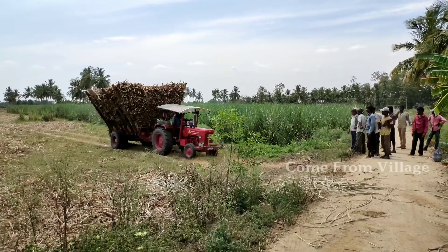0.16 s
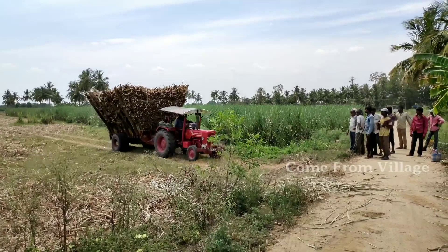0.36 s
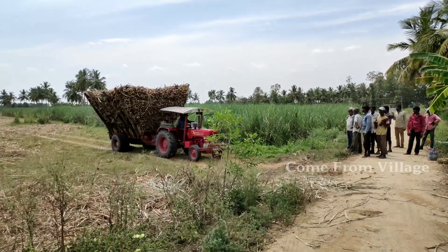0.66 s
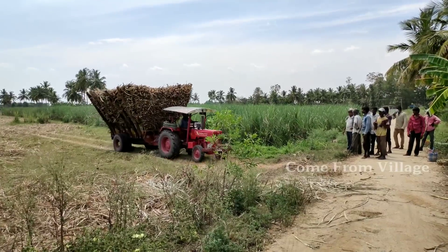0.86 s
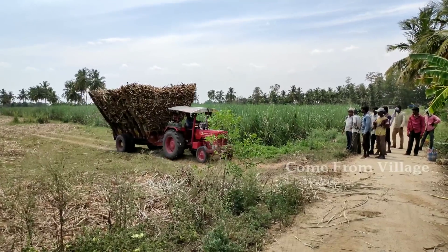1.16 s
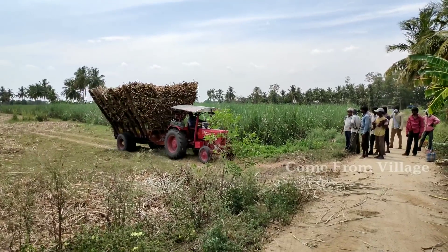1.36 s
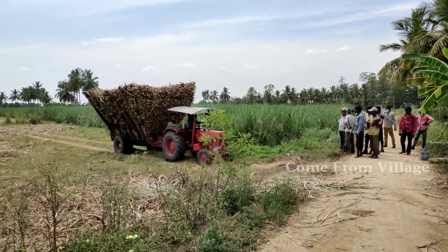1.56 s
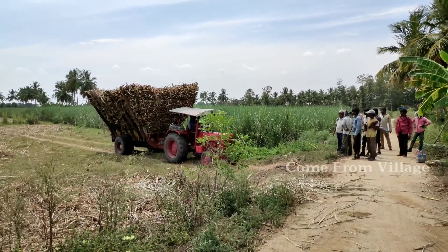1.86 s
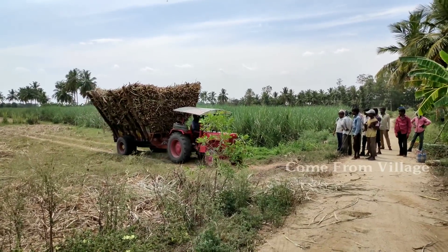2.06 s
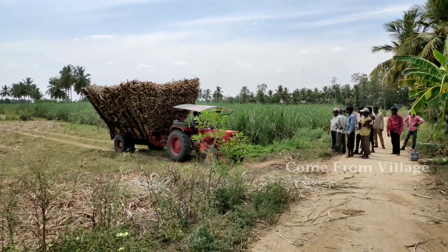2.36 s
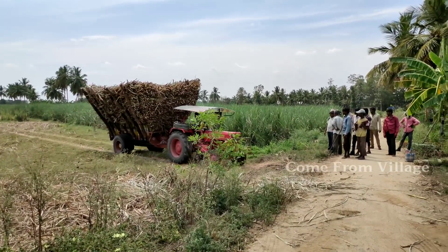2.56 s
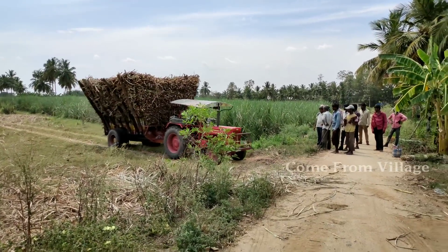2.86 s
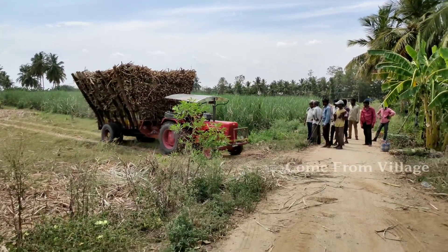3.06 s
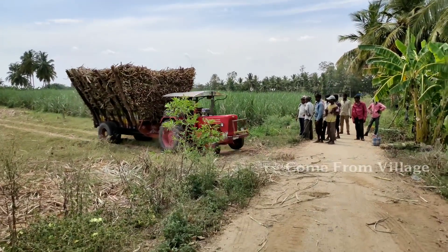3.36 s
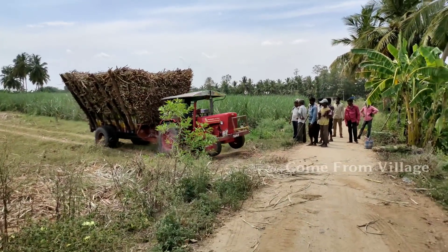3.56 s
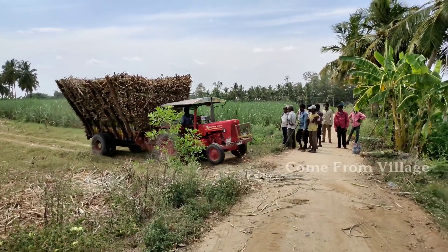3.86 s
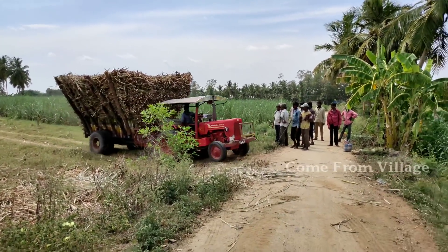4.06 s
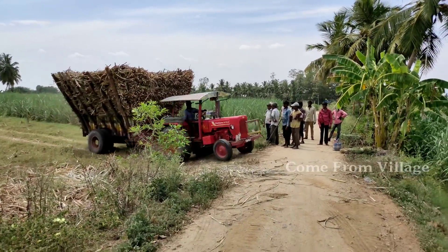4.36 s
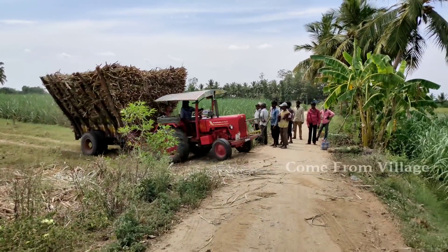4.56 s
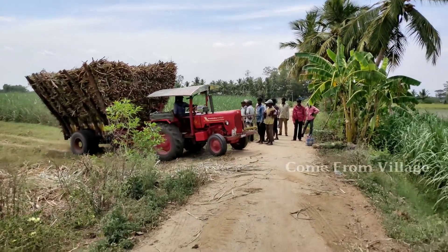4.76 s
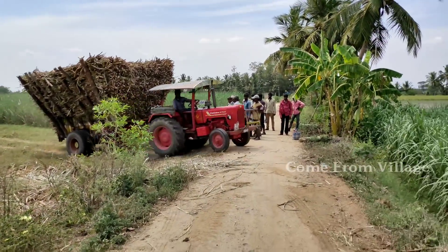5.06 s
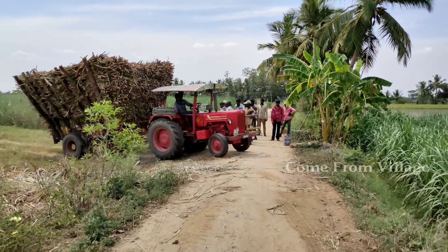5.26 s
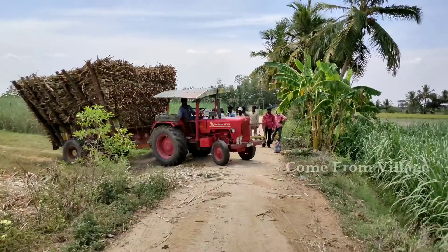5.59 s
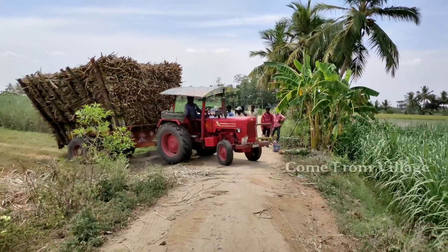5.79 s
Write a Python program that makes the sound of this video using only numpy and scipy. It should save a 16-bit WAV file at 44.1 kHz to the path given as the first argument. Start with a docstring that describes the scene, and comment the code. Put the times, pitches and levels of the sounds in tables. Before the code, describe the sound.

Out in a field, a tractor's diesel engine thumps slowly and unevenly, then revs up into a hard, clattering growl as it hauls a trailer of cane toward the microphone. A low rumble of wheels and wind lies beneath it, with occasional sharp snaps and light knocks from the load. The engine backs off several times in the second half before pulling strongly again, now closer and louder.

```python
"""A diesel tractor chugs unevenly, revs up, eases off a few times and pulls hard again, coming closer.
It drags a loaded cane trolley over a field onto a dirt track: wheels rumble, the load knocks and snaps.
The governor hunts at low speed until the throttle opens. The four cylinders fire as a pulse train that
drives resonators: each firing thumps and barks in the exhaust stack, knocks in the block and lets out
a rasp of gas. The firing rate sets the pitch; fuel, speed and distance set the level."""
import sys
import numpy as np
from scipy import signal
from scipy.fft import rfft, irfft, next_fast_len
from scipy.io import wavfile
from scipy.ndimage import uniform_filter1d

SR = 44100
rng = np.random.default_rng(int(sys.argv[2]) if len(sys.argv) > 2 else 0)


def store_pcm(level_fs):
    """Save levels as 16-bit WAV."""
    pcm = np.round(np.clip(level_fs, -1, 1) * 32767).astype(np.int16)
    wavfile.write(sys.argv[1], SR, np.atleast_2d(pcm).T)


N = 261513
TIME = np.arange(N) / SR

# firing rate of the engine: t/s, f/Hz
FIRING_RATE = [(0.0, 41.5), (0.386, 44.8), (0.523, 44.98), (0.67, 41.3), (0.905, 43.2), (1.685, 43.73),
               (1.793, 41.3), (2.019, 41.59), (2.251, 49.67), (2.494, 51.39), (3.062, 58.99),
               (3.366, 65.64), (3.593, 63.72), (3.841, 68.8), (4.122, 66.46), (4.257, 68.96),
               (5.005, 70.08), (5.171, 67.69), (5.93, 68.07)]
# shots of fuel from the hunting governor: middle t/s, length/s, share of full fuel added
GOVERNOR_SURGES = [(.1, .33, 0.38), (.39, 0.175, 0.89), (.719, 0.22, 0.6), (.878, .165, 0.27),
                   (1.0, 0.16, 0.39), (1.296, 0.28, .38), (1.614, 0.25, 0.18), (1.94, .26, 0.58)]
# brief easings under way: middle t/s, length/s, share of full fuel removed
FUEL_EASINGS = [(2.37, 0.25, 0.12), (2.897, 0.16, .18), (3.904, 0.18, .38), (4.395, 0.22, 0.65),
                (4.485, .2, 0.43), (4.717, 0.32, 0.64), (4.996, 0.57, .73), (5.65, 0.14, 0.17)]
# cylinders in firing order: exhaust level/dB, knock and rasp level/dB, bark delay/firing cycles
CYLINDERS = [(-1.1, 3.5, -0.001), (-1.3, 4.5, -0.018), (-0.44, 5, -0.001), (-1.25, 3, -0.028)]
# spectrum of wheels and wind: f/Hz, level/dB
GROUND_SPECTRUM = [(20, -12), (50, -4), (110, -3), (200, -4), (280, -6), (370, -15), (500, -13), (800, -20),
                   (3000, -36)]
# knocks and snaps of the load: t/s, level/dB, f/Hz, time to fall 60 dB/s
LOAD_IMPACTS = [(2.5328, -17.5, 7270, 0.0061), (2.5738, -12, 7250, 0.0069), (3.7454, -9.5, 6860, 0.0051),
                (4.470, -17.5, 393.1, 0.071), (4.472, -27.5, 1915, 0.021), (4.825, -28.5, 554.3, 0.11),
                (5.0892, -5.5, 7240, 0.0051)]
# modes of a loose metal panel: f/Hz, width/Hz, level/dB
PANEL_MODES = [(497, 52, -1.5), (940, 120, 0), (1050, 130, 0.5), (1122, 55, 2.5), (1746, 99, -4)]
# whistles in the exhaust gas: middle t/s, length/s, f/Hz, width/Hz, level/dB
GAS_WHISTLES = [(1.251, 0.16, 5250, 597, -52), (1.317, 0.15, 5920, 700, -48), (1.96, 0.15, 5870, 800, -45),
                (2.14, 0.17, 6000, 549.3, -41), (2.602, 0.66, 6080, 600, -42),
                (3.7, 0.28, 6600, 884.5, -37), (5.322, .18, 6190, 550, -33),
                (5.526, 0.31, 6530, 800, -33.5)]
# spectrum of the escaping gas: f/Hz, level/dB
RASP_SPECTRUM = [(1500, -32), (3500, -22), (4700, -17.5), (5400, -11.5), (6050, -9), (6600, -7), (7150, -4),
                 (7450, 0.5), (7700, -10), (8000, -12.5)]
# modes of the block and bonnet: f/Hz, width/Hz, level/dB
BLOCK_MODES = [(503, 140, 4.5), (676, 156, 5.5), (974, 220, 2), (1161, 190, -2), (1351, 200, -1),
               (1503, 256, 0.8), (1804, 170, -3.5), (1998, 203, -1.5), (2184, 290, -4), (2597, 268, -3),
               (2886, 160, -2.5), (3113, 165, -2), (3343, 170, -4.5), (3575, 124, -1.5), (3945, 380, -7.5),
               (4560, 1180, -6)]
# upper response of the stack when lugging: f/Hz, level/dB
COUGH_RESPONSE = [(130, -23), (285, 1), (375, -15.5), (430, 0.5), (500, -5.5), (550, -1.5), (630, 4),
                  (750, -3.5), (850, -8), (1000, -5.5), (1200, -20.5), (1550, -18.5), (2250, -14),
                  (2900, -21.5), (5000, -36)]
# upper response of the stack at speed: f/Hz, level/dB
GROWL_RESPONSE = [(130, -34), (255, -5), (305, -22), (340, -1), (375, -6), (405, -5), (440, -4.5),
                  (475, 1.5), (510, 5.5), (545, -1.5), (578, -1), (612, -2.5), (680, -9.5), (735, -19),
                  (815, -18), (900, -31.5), (1500, -36.5)]
# low response of the stack: f/Hz, level/dB
STACK_RESPONSE = [(23, -53.5), (38, -6.5), (52, 2.5), (63, 3.9), (69, -0.06), (105, 1.6), (135, 3.5),
                  (152, -2.5), (172, -4.5), (205, -6.5), (268, -8), (305, -20.5), (340, -11), (600, -27.5)]
# added ringing of the pipe on light fuel: f/Hz, level/dB
LIGHT_FUEL_RESPONSE = [(40, 6), (62, -7.5), (88, 4.0), (110, -14.5), (130, -2.5), (172, 2.0),
                       (215, -20.5), (300, -3), (380, -22)]
# muffling of the left microphone port: f/Hz, left minus right level/dB
PORT_BALANCE = [(60, 1.5), (180, 3.5), (310, -0.5), (540, -3.5), (750, -4), (1000, -10.5), (1600, -23.5),
                (2800, -16.5), (4900, -12), (6400, -2.5), (7500, -17.5)]
# phase between the ports: f/Hz, left minus right phase/rad
PORT_PHASE = [(0, 0), (130, -.3), (500, -1.2), (800, -1.9), (1500, -2.4), (2500, -.3), (6000, -.8),
              (7000, -3)]

THROTTLE_AT_S, THROTTLE_RISE_S = 1.991, .14
WORKING_HZ = 60  # firing rate at the working speed
START_M, CLOSING_M_S = 20.85, 2.267  # the levels below hold at the starting distance
# level/dB at full fuel and working speed, loss/dB with the fuel shut, rise/dB per octave of speed
THUMP_LAW, BARK_LAW = (-21.5, 13.4, 3.6), (-38, 14.6, 5.9)
CLATTER_LAW, RASP_LAW = (-39, 5.87, 5.2), (-30, 11.8, 4.4)
GROUND_DB, GROUND_DB_PER_OCTAVE = -41, 11.5  # at working speed, and rise with speed
PANEL_DB = -50.5
CUTOFF_HZ = 7800


def undb(db):
    """Amplitude ratio of a level in decibels."""
    return 10 ** (np.asarray(db) / 20)


def unit(x):
    """Normalisation to rms 1."""
    return x / np.sqrt(np.mean(x ** 2))


def gains(response, size):
    """Magnitude response on the transform bins, interpolated in log frequency."""
    hz, db = np.transpose(response)
    return undb(np.interp(np.log(np.fft.rfftfreq(size, 1 / SR) + 1), np.log(hz), db))


def colour(x, response):
    """Minimum-phase filter: by causality it rings after each blow, never before."""
    size = 2 * next_fast_len(N)
    cepstrum = irfft(np.log(gains(response, size)))
    cepstrum[1:size // 2] *= 2
    cepstrum[size // 2 + 1:] = 0
    return irfft(rfft(x, size) * np.exp(rfft(cepstrum)))[..., :N]


def resonate(x, modes):
    """Modal filter: the powers of independent, steep resonances add."""
    hz = np.geomspace(100, 8000, 500)
    power = sum(undb(db) ** 2 / (1 + ((hz ** 2 - f ** 2) / (hz * width)) ** 2) ** 2
                for f, width, db in modes)
    return colour(x, np.transpose([hz, 10 * np.log10(power)]))


def blows(cycle, delay, pattern_db, scatter_db, jitter):
    """Quasi-periodic excitation: one impulse per firing, with delay and jitter in firing cycles."""
    firing = np.arange(int(cycle[-1]) + 1)
    chance = np.clip(rng.standard_normal((len(firing), 2)), -2, 2)
    onset = firing + np.resize(delay, len(firing)) + jitter * chance[:, 0]
    at = np.interp(onset, cycle, np.arange(N)).astype(int)
    out = np.zeros(N)
    out[at] = undb(np.resize(pattern_db, len(firing)) + scatter_db * chance[:, 1])
    return out


def puffs(pulses, rise_s, fall_s):
    """Envelope with exponential attack and decay after every impulse."""
    t = TIME[:SR // 10]
    return unit(signal.fftconvolve(pulses, (1 - np.exp(-t / rise_s)) * np.exp(-t / fall_s))[:N])


def noise(apart):
    """Partly coherent white noise at two ports; `apart` is the side-to-mid amplitude ratio."""
    mid, side = rng.standard_normal((2, N))
    return mid + apart * side * np.array([[1], [-1]])


def arch(middle_s, length_s):
    """Half-cosine window of height 1."""
    return np.cos(np.pi * np.clip((TIME - middle_s) / length_s, -.5, .5))


def swells(table):
    """Superposition of raised-cosine bumps, one per row."""
    return sum(height * arch(s, length) ** 2 for s, length, height in table)


def strength(law, fuel, octaves):
    """Source gain whose level is linear in fuel and in octaves of speed."""
    full_db, shut_db, octave_db = law
    return undb(full_db - shut_db * (1 - fuel) + octave_db * octaves)


def ground_rumble(octaves):
    """Broadband noise of wheels and wind grows as a power of speed."""
    gain = undb(GROUND_DB + GROUND_DB_PER_OCTAVE * octaves)
    return gain * unit(colour(noise(apart=.16), GROUND_SPECTRUM))


def load_knocks():
    """Damped free vibration: the trolley bumps over ruts and dry cane snaps."""
    out = np.zeros(N)
    for s, db, hz, t60 in LOAD_IMPACTS:
        t = np.maximum(TIME - s, 0)
        out += undb(db) * np.sin(2 * np.pi * hz * t) * np.exp(-np.log(1000) * t / t60)
    return out


def panel_buzz(cycle):
    """Forced vibration: every firing shakes a loose panel, whose modes ring briefly."""
    pulses = blows(cycle, delay=.15, pattern_db=[0], scatter_db=2, jitter=.01)
    shaking = puffs(pulses, rise_s=.001, fall_s=.0067) * noise(apart=.7)
    return unit(resonate(shaking, PANEL_MODES))


def gas_whistles(cycle):
    """Amplitude modulation: thin, unsteady exhaust tones swell and throb with the firings."""
    out = np.zeros(N)
    for s, length, hz, width, db in GAS_WHISTLES:
        span = int(SR / width)
        waver = unit(uniform_filter1d(uniform_filter1d(rng.standard_normal(N), span), span))
        out += undb(db) * arch(s, length) * unit(waver * np.sin(2 * np.pi * hz * TIME))
    return out * (1 + .6 * np.sin(2 * np.pi * cycle))


def gas_rasp(cycle, hz, load, pattern_db):
    """Pulsed flow noise: separate chuffs at low speed and under load, a smoother hiss otherwise."""
    pulses = blows(cycle, delay=.1, pattern_db=pattern_db, scatter_db=1.1, jitter=.012)
    chuff = unit(puffs(pulses, rise_s=.0023, fall_s=.007) / hz ** .7)
    depth = np.clip(.4 + .5 * load - .021 * (hz - 45), 0, 1)
    return unit(colour((depth * chuff + 1 - depth) * noise(apart=.58), RASP_SPECTRUM))


def block_clatter(cycle, hz, load, pattern_db):
    """Impact excitation: each cylinder knocks on its own part of the block; gears whirr beneath."""
    pulses = blows(cycle, delay=.11, pattern_db=pattern_db, scatter_db=1.3, jitter=.003)
    t = TIME[:SR // 20]
    ring = 0
    for cylinder in range(len(CYLINDERS)):  # the pattern repeats every two turns
        path = rng.standard_normal((2, len(t))) * np.exp(-t / .0048)
        own_pulses = pulses * (np.floor(cycle) % len(CYLINDERS) == cylinder)
        ring = ring + signal.fftconvolve(own_pulses[None], path, axes=1)[:, :N]
    rattle = puffs(pulses, rise_s=.0015, fall_s=.0054) * noise(apart=.88)
    knock = unit((.56 * unit(ring) + 1.14 * rattle) / np.sqrt(hz))
    gears = unit(noise(apart=.739))
    knock_share = np.clip(.28 + .36 * load - .01 * (hz - 45), .05, .95)
    return unit(resonate(np.sqrt(knock_share) * knock + np.sqrt(1 - knock_share) * gears, BLOCK_MODES))


def stack_bark(cycle, hz, load, pattern_db, late):
    """Pulse fronts excite the upper pipe modes: a ragged cough when lugging, a growl at full pull."""
    pulses = blows(cycle, delay=.13 + late, pattern_db=pattern_db, scatter_db=.8, jitter=.003)
    gas = puffs(pulses, rise_s=.001, fall_s=.0028) * noise(apart=.6)
    cough = unit(colour(.9 * unit(pulses) + gas, COUGH_RESPONSE))
    growl = unit(colour(unit(pulses) + .25 * gas, GROWL_RESPONSE))
    pull = np.clip((hz - 58.5) / 8.5, 0, 1) * (.5 + .5 * load)
    return unit((np.sqrt(1 - pull) * cough + np.sqrt(pull) * growl) / np.sqrt(hz))


def stack_thump(cycle, hz, load, pattern_db):
    """Pressure pulses drive the low pipe resonances; on light fuel they turn uneven and ring on."""
    firm = blows(cycle, delay=.13, pattern_db=pattern_db, scatter_db=.5, jitter=.0079)
    uneven = blows(cycle, delay=.13, pattern_db=pattern_db, scatter_db=3.5, jitter=.024)
    light = colour(uneven, LIGHT_FUEL_RESPONSE)
    valve = np.exp(-.5 * (np.arange(-200, 201) / SR / .0008) ** 2)  # gradual opening rounds each pulse
    pulses = signal.fftconvolve(load * firm + (1 - load) * light, valve, "same")
    return unit(colour(pulses, STACK_RESPONSE) / hz)


def scene():
    """Superposition: one crankshaft times the engine; engine and rumble follow the 1/r spreading law."""
    hz = np.interp(TIME, *np.transpose(FIRING_RATE))
    cycle = np.cumsum(hz) / SR + .5  # counts the firings
    octaves = np.log2(hz / WORKING_HZ)
    throttle = np.clip((TIME - THROTTLE_AT_S) / THROTTLE_RISE_S, 0, 1)
    load = np.clip(throttle - swells(FUEL_EASINGS), 0, 1)
    fuel = load + swells(GOVERNOR_SURGES)
    exhaust_db, knock_db, late = np.transpose(CYLINDERS)
    engine = (strength(THUMP_LAW, fuel, octaves) * stack_thump(cycle, hz, load, exhaust_db)
              + strength(BARK_LAW, fuel, octaves) * stack_bark(cycle, hz, load, exhaust_db, late)
              + strength(CLATTER_LAW, fuel, octaves) * block_clatter(cycle, hz, load, knock_db)
              + strength(RASP_LAW, fuel, octaves) * gas_rasp(cycle, hz, load, knock_db)
              + undb(PANEL_DB) * (1 - throttle) * panel_buzz(cycle))
    nearness = START_M / np.maximum(START_M - CLOSING_M_S * TIME, 1)
    return nearness * (ground_rumble(octaves) + engine) + load_knocks() + gas_whistles(cycle)


def record(dry):
    """Transfer function of a band-limited phone: the left port is muffled and lags in phase."""
    size = 2 * next_fast_len(N)
    phase = np.interp(np.fft.rfftfreq(size, 1 / SR), *np.transpose(PORT_PHASE))
    ratio = gains(PORT_BALANCE, size)
    response = 2 * np.array([ratio * np.exp(1j * phase), np.ones_like(ratio)]) / (1 + ratio)
    ports = irfft(rfft(dry, size) * response)[:, :N]
    return signal.sosfilt(signal.ellip(10, .2, 80, CUTOFF_HZ, fs=SR, output="sos"), ports)


dry = scene()
out = record(dry)
store_pcm(out)
```